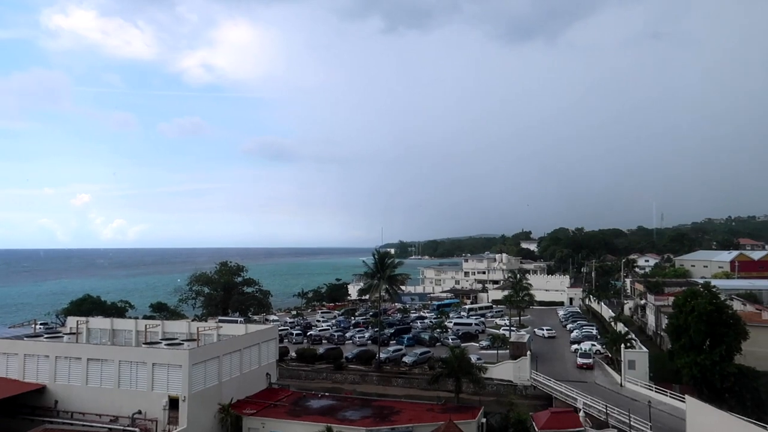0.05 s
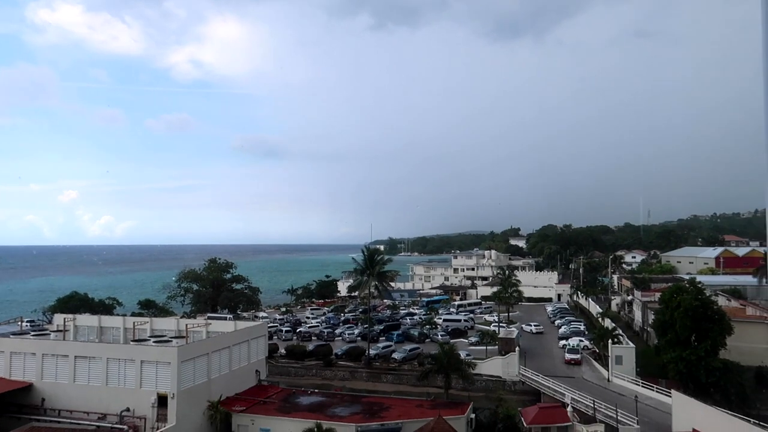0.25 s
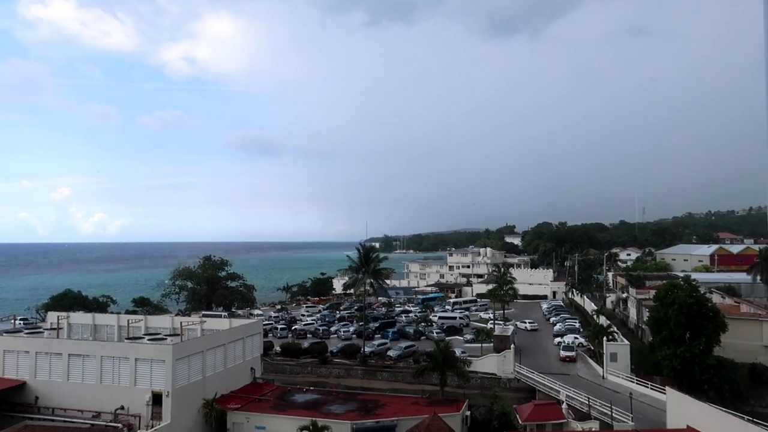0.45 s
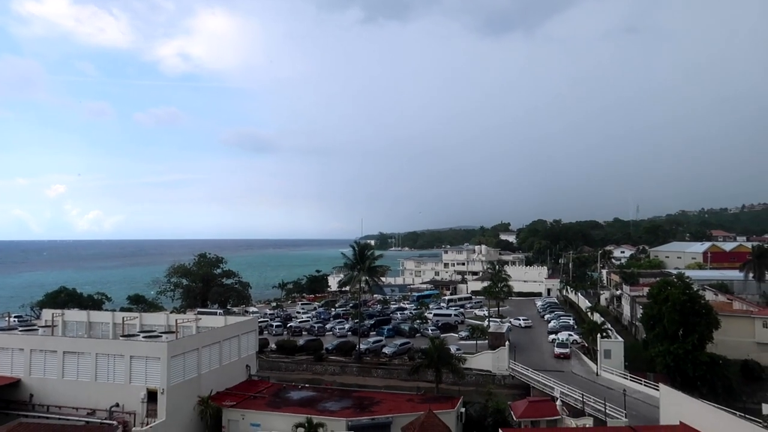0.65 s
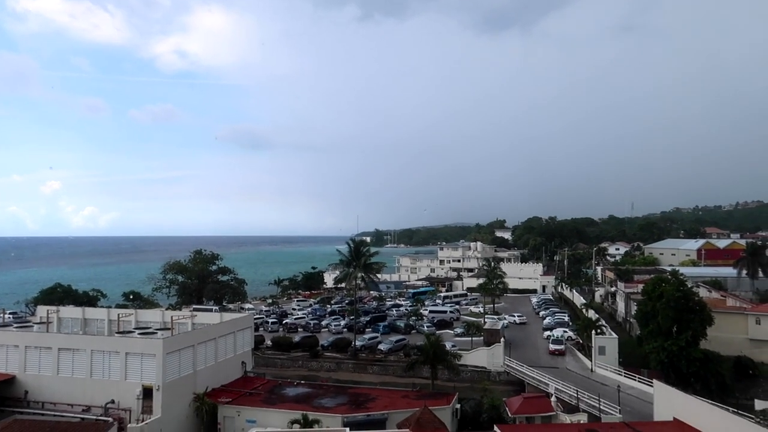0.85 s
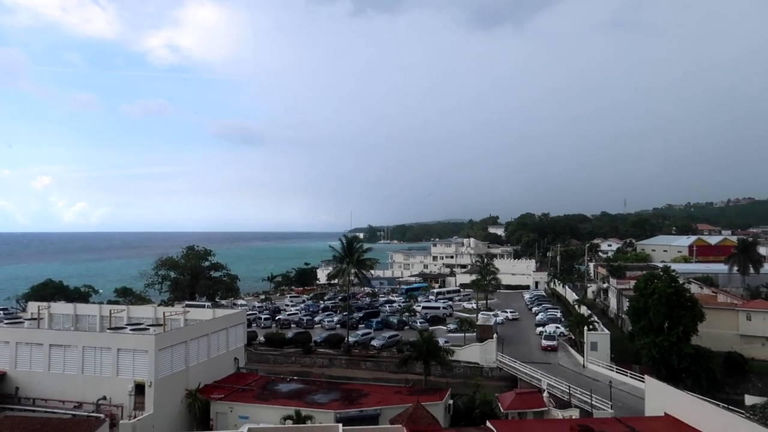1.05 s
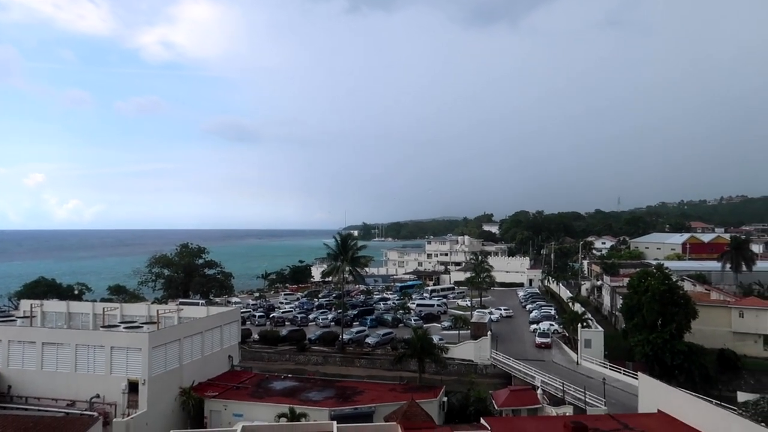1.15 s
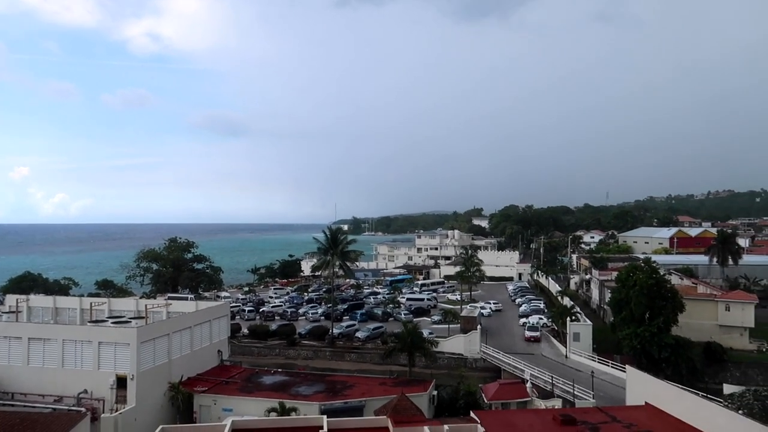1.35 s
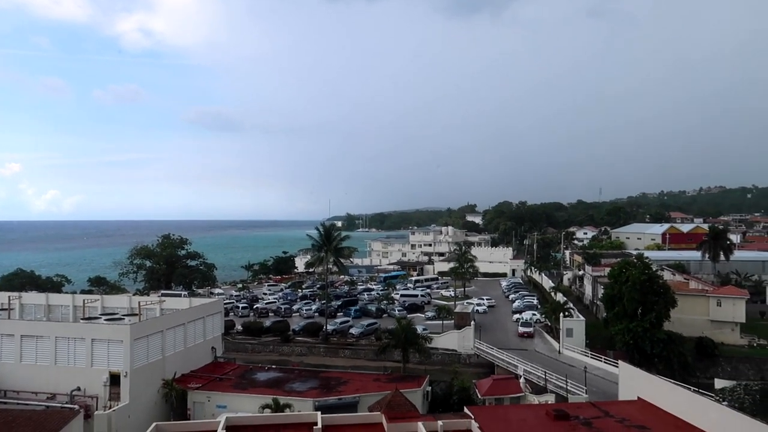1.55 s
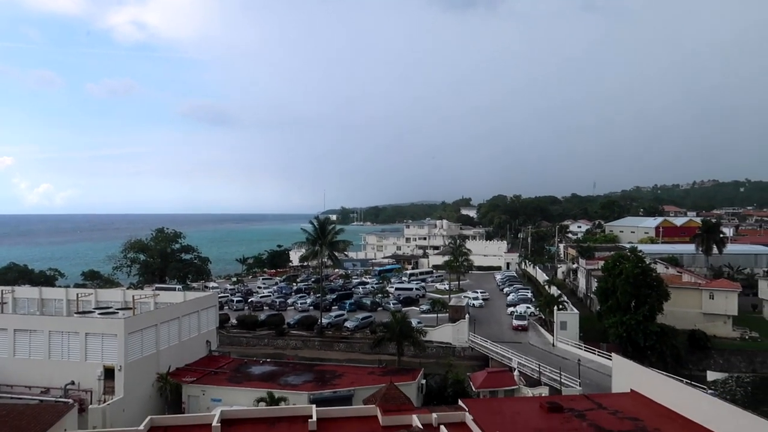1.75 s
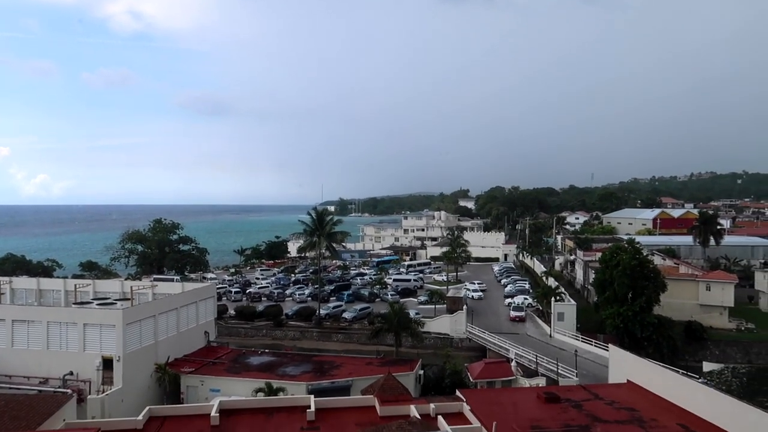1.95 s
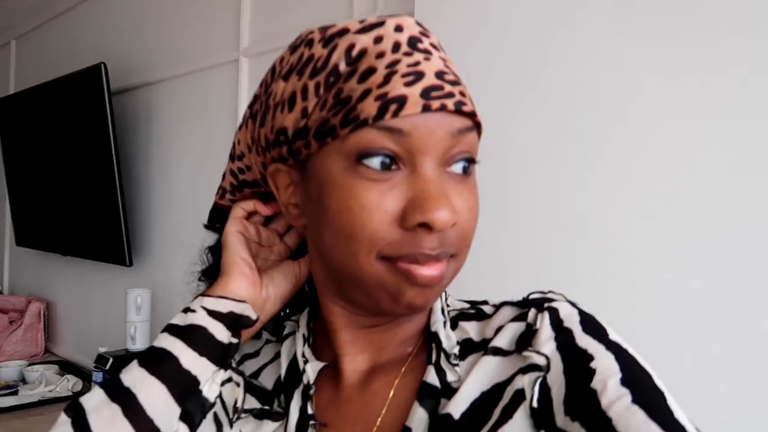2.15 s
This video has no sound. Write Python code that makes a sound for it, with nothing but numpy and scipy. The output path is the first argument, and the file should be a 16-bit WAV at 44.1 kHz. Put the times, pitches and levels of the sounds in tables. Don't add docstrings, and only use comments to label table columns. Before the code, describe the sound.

Low thunder cracks and rumbles over a seaside town, then dies into faint steady hiss

```python
import sys
import numpy as np
from scipy import signal
from scipy.io import wavfile

SR = 44100
rng = np.random.default_rng(int(sys.argv[2]) if len(sys.argv) > 2 else 0)


def materialize(psi):
    bounded = np.clip(np.atleast_2d(psi).T, -1, 1)
    quanta = np.round(bounded * 32767).astype(np.int16)
    wavfile.write(sys.argv[1], SR, quanta)


def amplitude_ratio(level_db):
    exponent = np.asarray(level_db, float) / 20
    return 10 ** exponent


N = 97505


def in_time(rows):
    s, *columns = np.transpose(rows)
    return [np.interp(np.arange(N) / SR, s, column) for column in columns]


def at_hz(points, hz):
    points = np.array(points)
    return np.interp(np.log(hz), np.log(points[:, 0] + 1), points[:, 1])


def rms_one(x):
    return x / np.sqrt(np.mean(x ** 2) + 1e-20)


def drift(rate):
    r = np.exp(-80 * np.pi * rate / SR)
    noise = rng.standard_normal(N // 40 + 2002)
    slow = signal.lfilter([1], [1, -2 * r, r * r], noise)[2000:]
    return np.interp(np.arange(N) / 40, np.arange(len(slow)), rms_one(slow - slow.mean()))


def resonance(x, hz, width):
    r = np.exp(-np.pi * width / SR)
    zeros = np.array([1, 0, -1]) * (1 - r * r) / 2
    return signal.lfilter(zeros, [1, -2 * r * np.cos(2 * np.pi * hz / SR), r * r], x)


def with_peaks(x, peaks):
    return x + sum(amplitude_ratio(db) * resonance(x, hz, width) for hz, width, db in peaks)


def shocks(per_s, spread_db, channels):
    size = (channels, N + SR)
    sizes = amplitude_ratio(spread_db * np.minimum(rng.exponential(1, size), 5)) * rng.choice([-1, 1], size)
    happens = rng.random(size) < per_s / SR
    return rms_one(sizes * happens + 1e-18)


def ping(s, db, hz, t60, rise_s):
    t = np.maximum(np.arange(N) / SR - s, 0)
    return amplitude_ratio(db - 60 * t / t60) * (1 - np.exp(-t / rise_s)) * np.sin(2 * np.pi * hz * t)


# (frequency [Hz], side over mid [dB])
STEREO_WIDTH = [(25, -46), (60, -50), (125, -40.5), (250, -35.5), (500, -16), (1000, -19), (2000, -7.5),
                (4000, 0)]


def bands(x, colour, patchy_db, weight_db=lambda hz: 0):
    out, together = 0, drift(2.4)
    lowest, highest = colour[0][0], colour[-1][0]
    edges = lowest * 2 ** np.arange(0, np.log2(highest / lowest) + .3, .5)
    for k, (low, high) in enumerate(zip(edges, np.minimum(edges[1:], .45 * SR))):
        band = signal.butter(2, [low, high], "band", fs=SR, output="sos")
        mid, side = signal.sosfilt(band, x[k % 2::2])[:, SR:]
        hz = np.sqrt(low * high)
        flicker_db = patchy_db * (.5 * together + drift(12))
        gain = amplitude_ratio(at_hz(colour, hz) + weight_db(hz) + flicker_db)
        out = out + gain * (mid + amplitude_ratio(at_hz(STEREO_WIDTH, hz)) * side * [[1], [-1]])
    return out


# (time [s], level [dB], far deep rumble [dB], near sharp crackle [dB])
ROLL_SWELLS = [(0.0, -33.5, -20.5, -19), (0.05, -34.5, -5, -6), (0.16, -27.5, -11.5, -11.5),
               (0.23, -37, -11.5, -9.5), (0.32, -28, -12.5, -7), (0.4, -27.5, -11, -13),
               (0.5, -29.5, -12, -13.5), (0.61, -31.5, -13.5, -11.5), (0.74, -28.5, -5.5, -10.5),
               (0.78, -23.5, -10.5, -12.5), (0.84, -29.5, -3, -15), (0.97, -35, -14.5, -10.5),
               (1.1, -36, -15, -14.5), (1.16, -43.5, -15, -16), (1.3, -44.5, -16.5, -21),
               (1.39, -56, -10, -16), (1.43, -45, -15, -14.5), (1.53, -52, -8, -17.5)]
# (frequency [Hz], level [dB])
ROLL_COLOUR = [(48, -17.5), (80, -3.5), (120, -5), (250, 2), (400, -9.5), (700, -18), (1300, -22.5),
               (2600, -61)]
# (frequency [Hz], width [Hz], level [dB])
BALCONY_MODES = [(360, 6.7, -21), (566.5, 24, -0.5), (719, 12, 4), (880, 12.2, 9), (1235, 16, 11.5)]
DEEP_BELOW_HZ, SHARP_ABOVE_HZ, ROLL_CUT_HZ = 135, 430, 2350
ROLL_END_S, ROLL_FADE_DB_PER_S = 1.45, 52


def roll():
    level_db, deep_db, sharp_db = in_time(ROLL_SWELLS)
    fade_db = ROLL_FADE_DB_PER_S * np.maximum(np.arange(N) / SR - ROLL_END_S, 0)
    deep_db = deep_db - deep_db[:N // 3].mean()
    sharp_db = sharp_db - sharp_db[:N // 3].mean()

    def distance_db(hz):
        return deep_db * (hz < DEEP_BELOW_HZ) + sharp_db * (hz > SHARP_ABOVE_HZ)

    crackle = shocks(per_s=1500, spread_db=2.0, channels=4)
    rumble = bands(crackle, ROLL_COLOUR, patchy_db=.8, weight_db=distance_db)
    rumble = signal.sosfilt(signal.butter(4, ROLL_CUT_HZ, fs=SR, output="sos"), rumble)
    return amplitude_ratio(level_db - fade_db) * rms_one(with_peaks(rumble, BALCONY_MODES))


# (time [s], level [dB], pitch [Hz], decay by 60 dB [s])
CLAPS = [(0.285, -22, 440, 0.07), (0.28, -23, 370, 0.1), (0.35, -12.5, 262, 0.14), (0.39, -21.5, 240, 0.3),
         (0.5, -19.5, 205, 0.14), (0.515, -27, 270, 0.085), (0.8, -19, 83, 0.33),
         (0.984, -23.5, 369, 0.144), (1.004, -30.5, 151, 0.55), (1.195, -32.5, 253, .12),
         (1.415, -36.5, 180, 0.17), (0.866, -35, 1100, 0.11), (0.987, -32, 870, .07),
         (0.72, -31, 856, 0.27), (0.001, -22, 170, 0.078)]
# (time [s], level [dB], pitch [Hz], decay by 60 dB [s])
MAIN_CLAP = [
    (0.7512, -13, 172, .2),
    (0.752, -14, 343, .38),
    (0.7572, -22, 516, .15),
]
CLAP_RISE_S, CLAP_CUT_HZ = .004, 2000


def claps():
    x = sum(ping(*clap, CLAP_RISE_S) for clap in [*CLAPS, *MAIN_CLAP])
    return signal.sosfilt(signal.butter(2, CLAP_CUT_HZ, fs=SR, output="sos"), x)


# (time [s], level [dB], tilt [dB per octave])
TOWN_SWELLS = [(0, -60, 3.5), (0.05, -68.5, 8), (0.1, -68.5, 3), (0.34, -68.5, 4.5), (0.6, -68.5, 5.5),
               (0.86, -69, 4), (0.97, -68, 2), (1.08, -75, 1.5), (1.2, -79, 3.5), (1.3, -82.5, 1.5),
               (1.45, -79, 1), (1.66, -70.5, 1.5), (1.85, -65.5, 1), (2.21, -65, 1.5)]
# (frequency [Hz], level [dB])
TOWN_LOW_COLOUR = [(22, 0), (45, -1), (100, 2), (165, -1.5), (280, -8), (500, -12), (700, -13),
                   (1000, -11.5)]
# (frequency [Hz], level [dB])
TOWN_HIGH_COLOUR = [(1000, 6.5), (1500, -4), (2000, -3), (3000, -13), (4000, -17), (8000, -32.5),
                    (12000, -39), (15000, -53)]
# (frequency [Hz], width [Hz], level [dB])
FANS = [(170, 40, 1), (440, 25, 10), (525, 25, 10)]
TOWN_LOW_DB, TOWN_HIGH_DB, TOWN_PATCHY_DB = 25.5, 15, .7
TILT_ABOUT_HZ = 5500


def town():
    level_db, tilt_db = in_time(TOWN_SWELLS)

    def brightness_db(hz):
        return tilt_db * np.log2(hz / TILT_ABOUT_HZ)

    low_noise, high_noise = rng.standard_normal((2, 4, N + SR))
    low = rms_one(with_peaks(bands(low_noise, TOWN_LOW_COLOUR, TOWN_PATCHY_DB), FANS))
    high = rms_one(bands(high_noise, TOWN_HIGH_COLOUR, TOWN_PATCHY_DB, brightness_db))
    return amplitude_ratio(level_db) * (amplitude_ratio(TOWN_LOW_DB) * low + amplitude_ratio(TOWN_HIGH_DB) * high)


WIND_DB, WIND_BELOW_HZ = -54, 55


def wind():
    band = signal.butter(4, [20, WIND_BELOW_HZ], "band", fs=SR, output="sos")
    gusts = signal.sosfilt(band, rng.standard_normal(N + SR))[SR:]
    follow_db = np.minimum(in_time(ROLL_SWELLS)[0] + 33, 0)
    return amplitude_ratio(WIND_DB + follow_db) * rms_one(gusts)


# (frequency [Hz], width [Hz], level [dB], start [s], stop [s])
FITTING_MODES = [
    (2210, 80, -63, .89, 1.06),
    (3030, 130, -62, .89, 1.0),
    (3430, 35, -62, .897, .965),
    (3100, 130, -72, 1.0, 1.14),
    (5450, 200, -73, .893, .995),
    (2600, 120, -60, .315, .345),
    (4200, 140, -67, .035, .06),
]
BUZZ_RISE_S, BUZZ_FADE_DB_PER_S, BUZZ_STOP_DB_PER_S = 0.0045, 22, 398


def fitting():
    t, out = np.arange(N) / SR, 0
    contacts = shocks(per_s=3000, spread_db=0.67, channels=len(FITTING_MODES))
    for touch, (hz, width, db, start, stop) in zip(contacts, FITTING_MODES):
        since = np.maximum(t - start, 0)
        stopped = np.maximum(t - stop, 0)
        fade_db = BUZZ_FADE_DB_PER_S * since + BUZZ_STOP_DB_PER_S * stopped
        shape = (1 - np.exp(-since / BUZZ_RISE_S)) * amplitude_ratio(db - fade_db)
        buzz = resonance(resonance(touch, hz, width), hz, 2 * width)[SR:]
        out = out + shape * rms_one(buzz)
    return out * amplitude_ratio([[1], [-1]])


# (time [s], level [dB], pitch [Hz], left up and right down [dB])
DRIPS = [
    (0.039, -68, 7800, 0),
    (0.32, -70, 6500, 6),
    (1.88, -68, 5300, 6),
    (2.12, -68, 8000, 0),
]
DRIP_T60_S, DRIP_RISE_S = .025, .001


def drips():
    out = 0
    for s, db, hz, pan_db in DRIPS:
        out = out + ping(s, db, hz, DRIP_T60_S, DRIP_RISE_S) * amplitude_ratio([[pan_db], [-pan_db]])
    return out


def scene():
    return roll() - claps() + town() + wind() + fitting() + drips()


def band_limit(x):
    return signal.sosfilt(signal.butter(12, 15000, fs=SR, output="sos"), x)


def record(dry):
    return band_limit(dry)


dry = scene()
out = record(dry)
materialize(out)
```